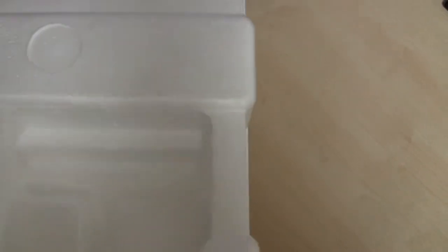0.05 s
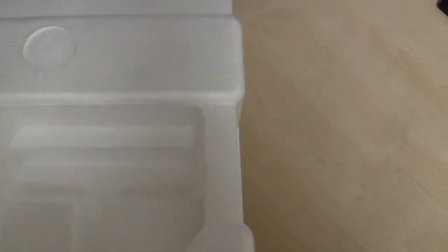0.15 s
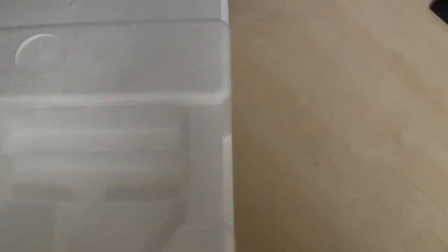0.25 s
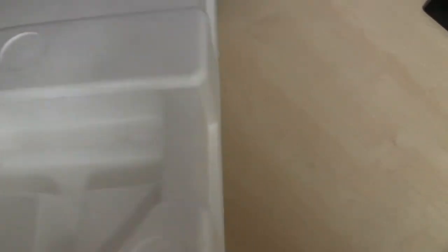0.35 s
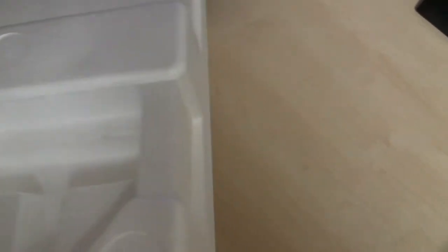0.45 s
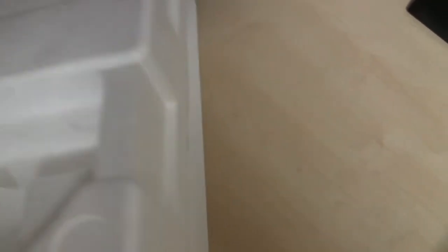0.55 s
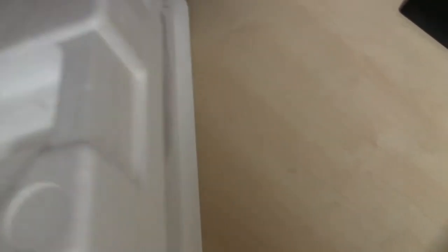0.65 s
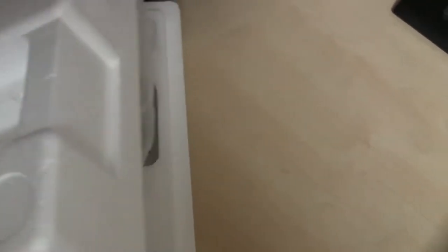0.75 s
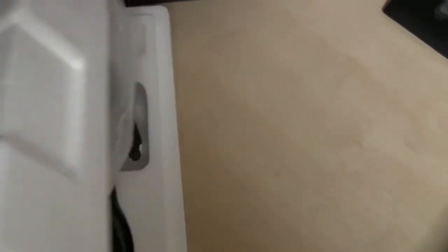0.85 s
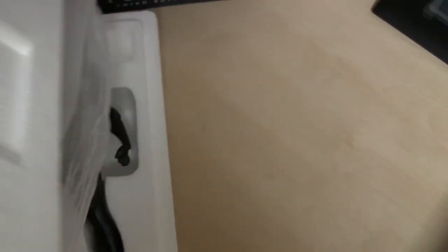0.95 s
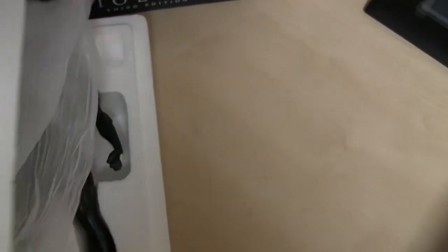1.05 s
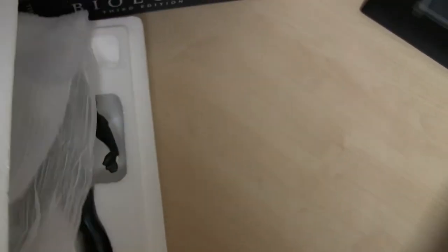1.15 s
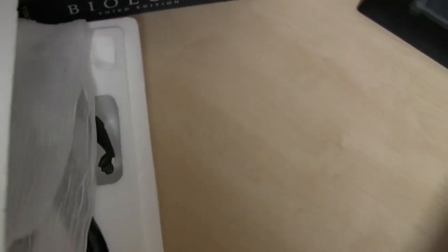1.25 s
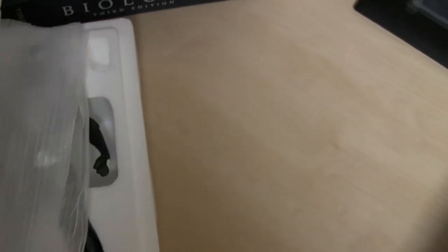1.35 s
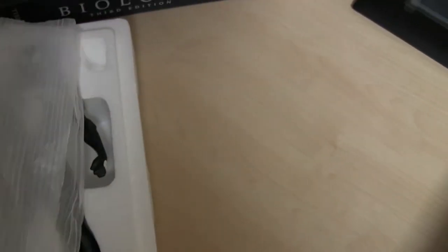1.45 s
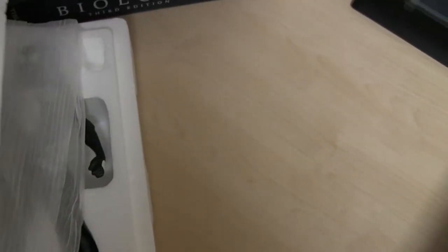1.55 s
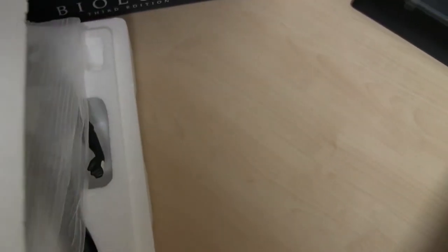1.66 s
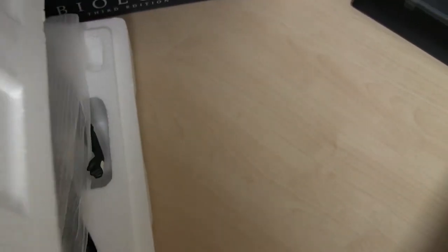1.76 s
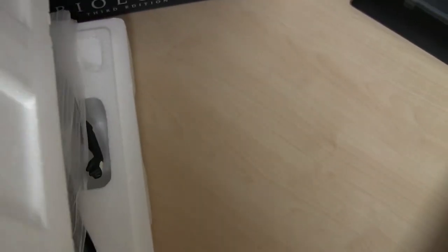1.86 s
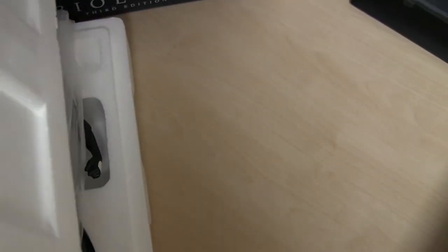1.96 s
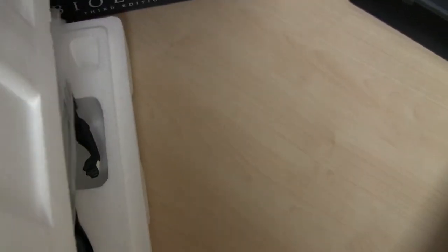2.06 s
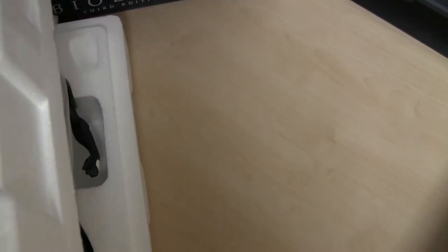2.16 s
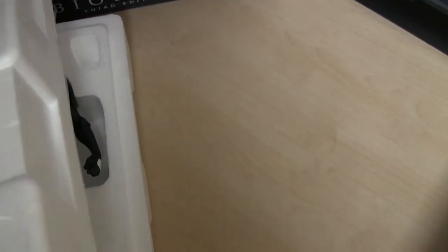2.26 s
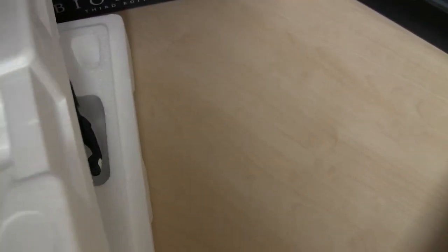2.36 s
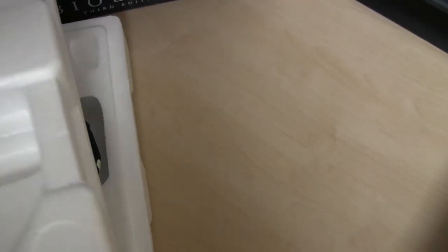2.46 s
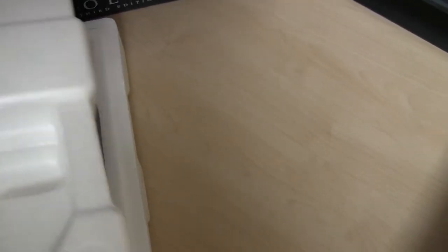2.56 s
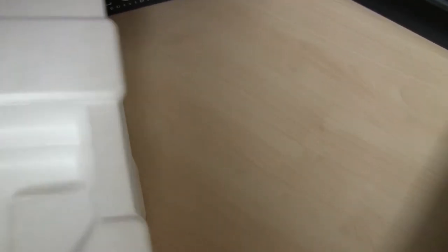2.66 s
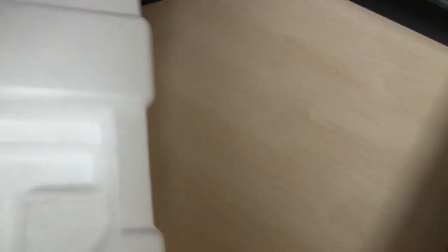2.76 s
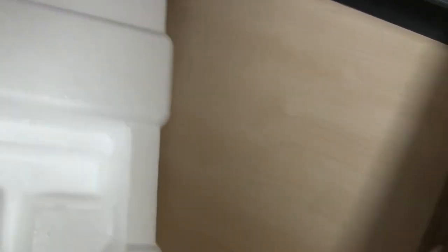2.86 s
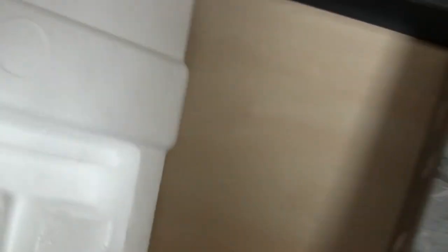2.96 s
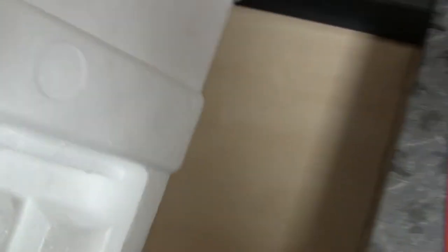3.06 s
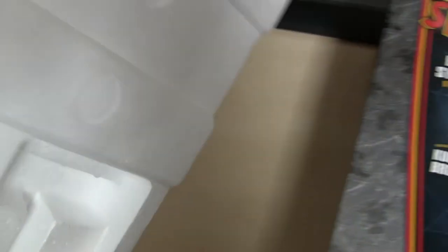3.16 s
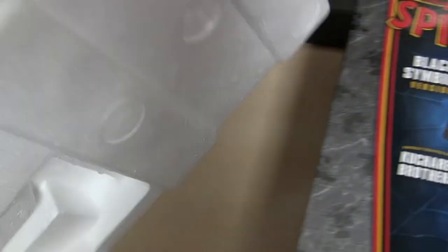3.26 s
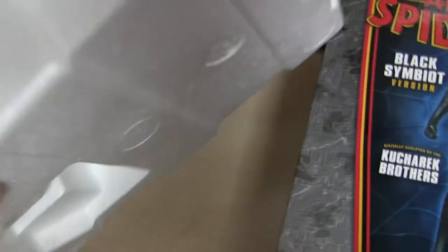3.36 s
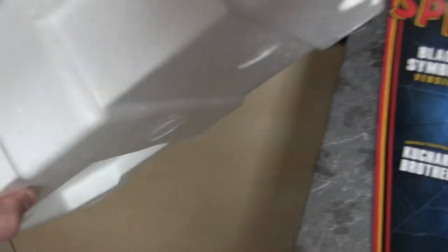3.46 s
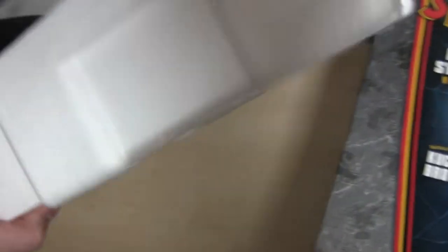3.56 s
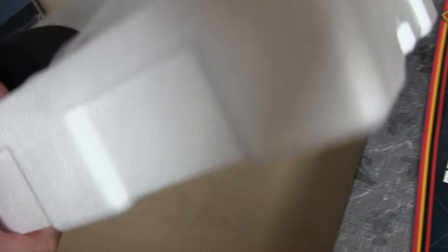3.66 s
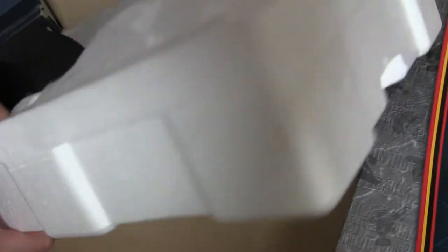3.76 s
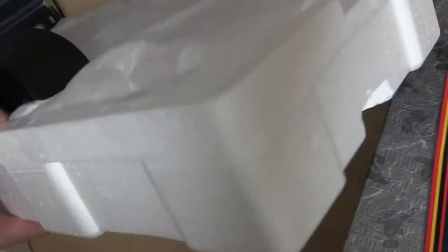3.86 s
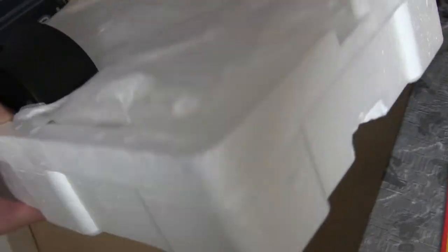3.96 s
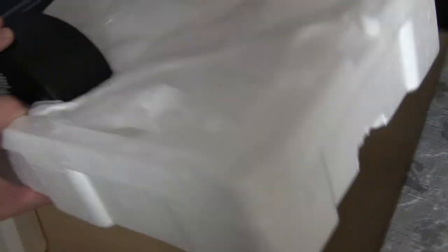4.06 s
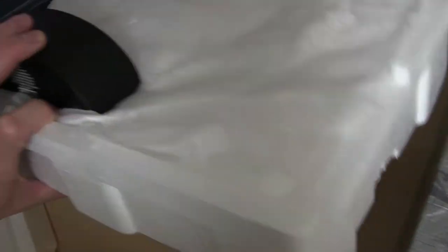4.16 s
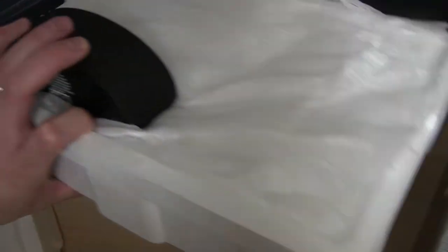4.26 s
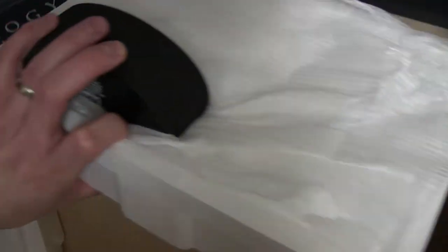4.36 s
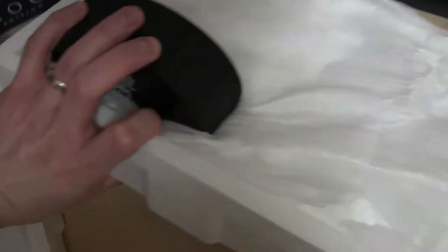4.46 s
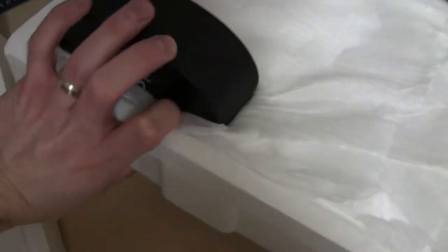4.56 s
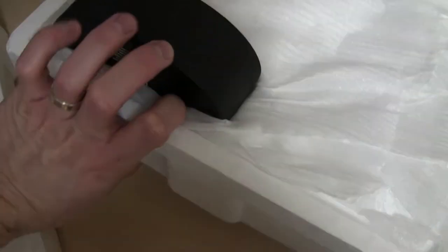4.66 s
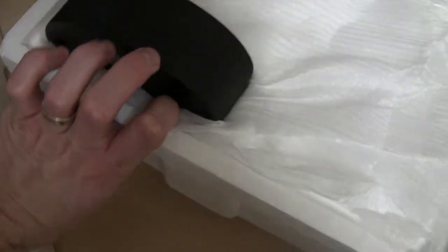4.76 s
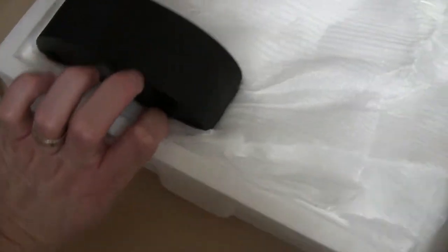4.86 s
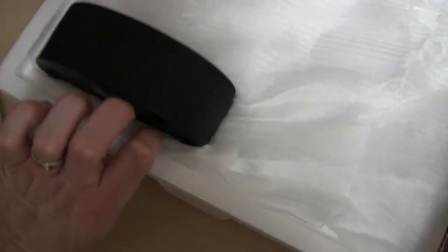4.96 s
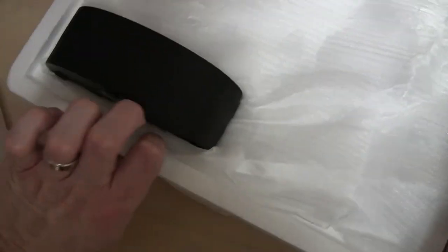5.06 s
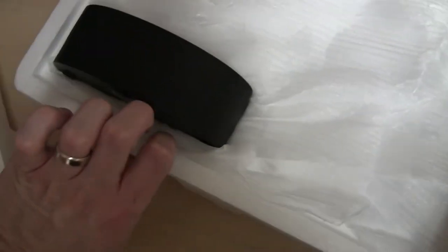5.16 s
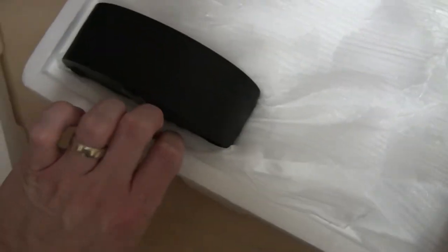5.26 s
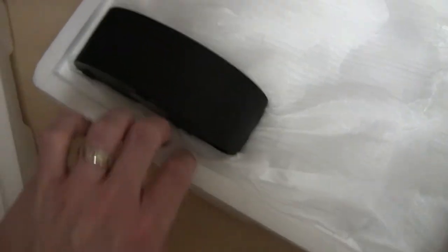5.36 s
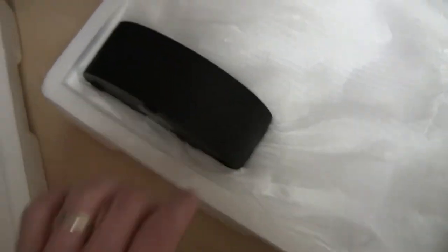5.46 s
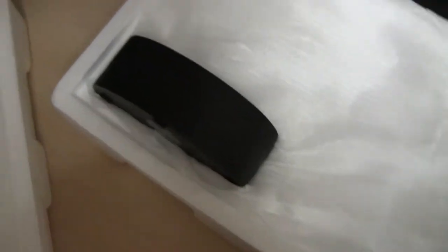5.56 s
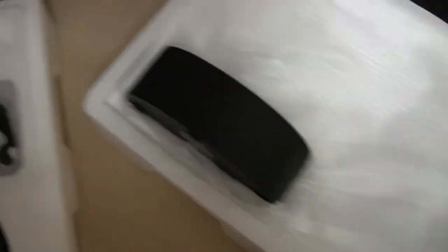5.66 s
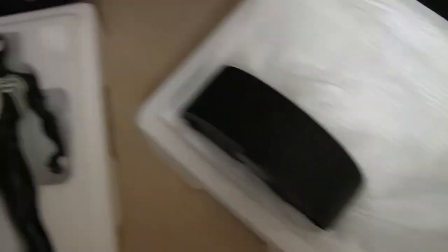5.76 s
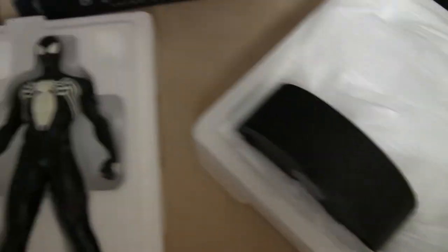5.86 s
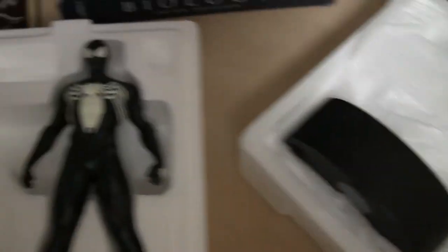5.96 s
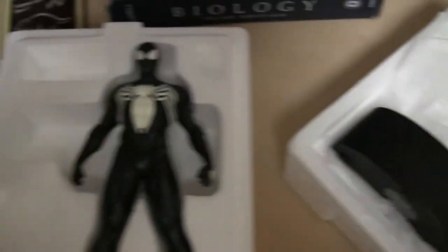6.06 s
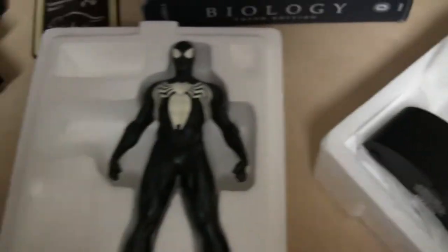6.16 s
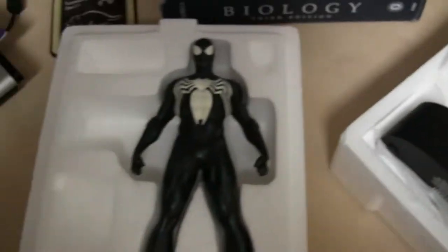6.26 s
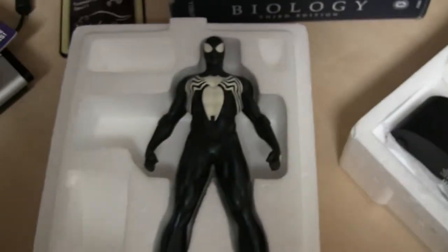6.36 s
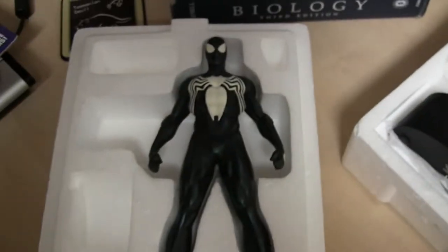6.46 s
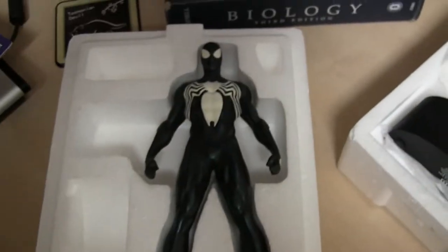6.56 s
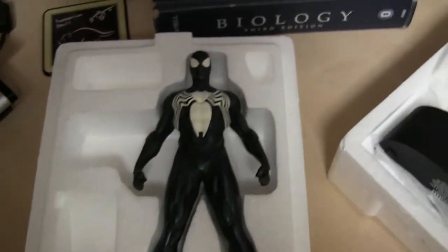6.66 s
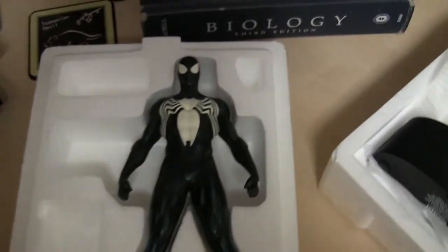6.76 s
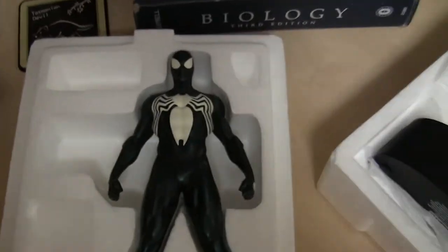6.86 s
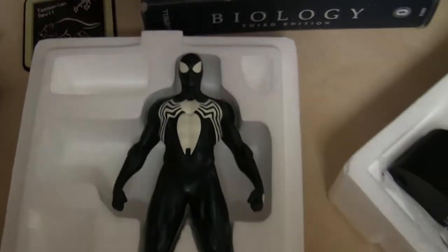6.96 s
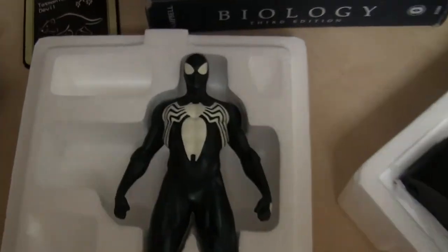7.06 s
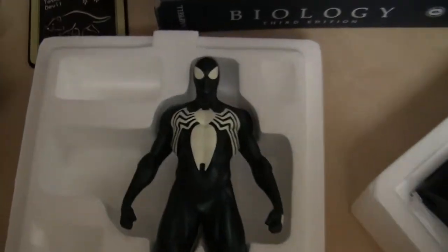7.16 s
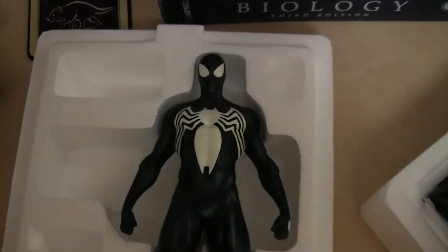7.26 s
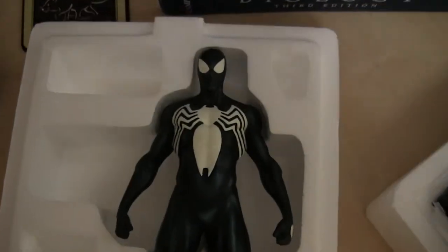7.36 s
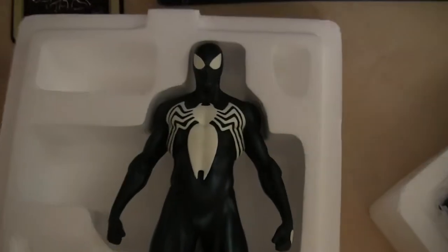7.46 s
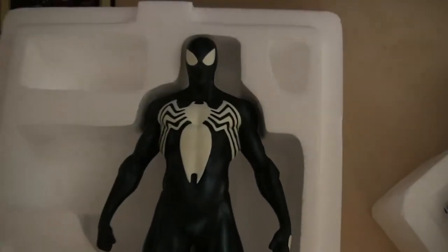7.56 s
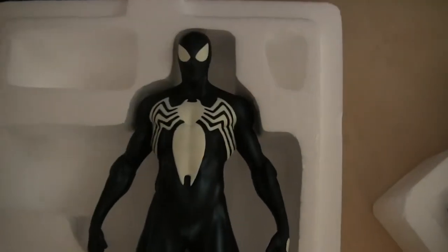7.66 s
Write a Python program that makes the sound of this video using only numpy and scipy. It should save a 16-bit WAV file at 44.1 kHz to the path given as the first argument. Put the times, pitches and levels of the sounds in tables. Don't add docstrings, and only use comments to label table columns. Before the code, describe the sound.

Foam box halves are eased apart near the camera at a desk: hollow bumps, dry squeaks, stick-slip creaks and isolated snaps. Things go nearly silent, then the lower half is knocked and handled, wrapping rustles briefly, and the block is pressed down loudly with bright chattering crackles. A solid set-down and quick rocking follow, then light scuffs, quiet hum and a tiny click.

```python
import sys
import numpy as np
from scipy import signal
from scipy.fft import rfft, irfft, next_fast_len
from scipy.io import wavfile
from scipy.ndimage import uniform_filter1d

SR = 44100
rng = np.random.default_rng(int(sys.argv[2]) if len(sys.argv) > 2 else 0)


def undo_db(level):
    steps = np.asarray(level, float) / 20
    return 10 ** steps


def int16_out(signal):
    q = np.round(np.clip(np.atleast_2d(signal).T, -1, 1) * 32767)
    wavfile.write(sys.argv[1], SR, q.astype(np.int16))


N = 340452
TIME = np.arange(N) / SR


def unit(x):
    return x / np.sqrt(np.mean(x ** 2) + 1e-20)


def along(points, hz):
    f, v = np.transpose(points)
    return np.interp(np.log(hz + 1), np.log(f + 1), v)


def filtered(x, response):
    size = x.shape[-1]
    m = next_fast_len(size + 8192)
    return irfft(rfft(x, m) * response(np.fft.rfftfreq(m, 1 / SR)), m)[..., :size]


def coloured(x, spectrum):
    return unit(filtered(x, lambda hz: undo_db(along(spectrum, hz))))


def resonant(modes):
    def response(f):
        total = 0
        for k, (centre, width, db) in enumerate(modes):
            drag = 1j * f * width
            total = total + (-1) ** k * undo_db(db) * drag / (centre * centre - f * f + drag)
        return total
    return response


def grit(grain_db, streak_db, count=10):
    unevenness = unit(uniform_filter1d(rng.standard_normal(N), size=40))
    beads = rng.standard_normal(N) * undo_db(grain_db * unevenness)
    z = signal.stft(beads, nperseg=512)[2]
    streaks = uniform_filter1d(rng.standard_normal(z.shape), size=3, axis=0)
    streaks = uniform_filter1d(streaks, size=count, axis=1)
    return unit(signal.istft(z * undo_db(streak_db * unit(streaks)), nperseg=512)[1][:N])


def ports(x, spread, bass_hz):
    hz, t, z = signal.stft(x, SR, nperseg=256)
    turn = np.exp(2j * np.pi * rng.random(z.shape))
    scatter = undo_db(along(spread, hz) + 2)[:, None]
    side = signal.istft(z * turn * scatter, SR, nperseg=256)[1][:N]
    side = filtered(side, lambda f: f ** 3 / (f ** 3 + bass_hz ** 3))
    return np.array([x + side, x - side])


def room_hum():
    # [Hz, dB per Hz]
    hum_colour = [(120, -30), (200, -8), (300, -7.5), (500, -12.5), (700, -14), (1040, -10), (1320, -13),
                  (1650, -10), (2050, -11), (2500, -16), (3130, -17), (5500, -22), (16000, -31)]
    # [s, dB]
    hum_level = [(3.3, -57), (5.5, -56)]
    # [Hz, dB]
    diffuse = [(60, -19), (110, -5.5), (200, -1.5), (380, -3.5), (700, -4), (1290, -9), (2380, -6),
               (4400, -8.5), (8120, -8), (15000, -5)]
    hum = undo_db(np.interp(TIME, *np.transpose(hum_level))) * coloured(grit(.6, .8), hum_colour)
    return ports(hum, diffuse, 70) * undo_db([[.55], [-.55]])


def room_echo(foam):
    # [Hz, s]
    decays = [(150, 0.23), (1000, 0.33), (4000, 0.21), (12000, 0.13)]
    hz, t, z = signal.stft(rng.standard_normal((2, SR // 2)), SR, nperseg=256)
    tail = signal.istft(z * undo_db(-60 * t / along(decays, hz)[:, None]), SR, nperseg=256)[1]
    tail = tail / np.linalg.norm(tail[0])
    return signal.fftconvolve(np.pad(foam, (300, 0))[None], tail, axes=1)[:, :N]


def handling():
    # [s, dB, dB]
    jolts = [
        (-.01, -43.5, -76),
        (3.405, -27, -48),
        (4.495, -27.5, -53),
        (5.058, -28, -58),
    ]
    # [s, dB, dB]
    shifts = [(.43, -55.5, -59), (1.07, -56, -83), (1.33, -67, -67), (1.8, -71, -84), (2.9, -55.5, -86),
              (3.65, -54, -71), (4.04, -53.5, -64), (4.74, -40.5, -72.5), (5.2, -49.5, -47),
              (6.0, -64, -61)]
    # [Hz, dB per Hz]
    deep_colour = [(15, -30), (35, -5), (70, 2.5), (110, -6), (300, -70.5)]
    thud_colour = [(50, -41), (100, -9.5), (220, -9.5), (320, -12), (700, -57)]
    held_thud_db, held_deep_db = -67.5, -78
    power = undo_db([[held_thud_db], [held_deep_db]]) ** 2 * np.ones(N)
    for rows, rise, fall in ((jolts, 4000, 220), (shifts, 140, 140)):
        for s, thud_db, deep_db in rows:
            slope = np.where(TIME < s, rise, -fall)
            power += undo_db([[thud_db], [deep_db]]) ** 2 * undo_db(slope * (TIME - s)) ** 2
    thud, deep = np.sqrt(power)
    return deep * coloured(grit(1.5, 0.93), deep_colour) + thud * coloured(grit(5.4, 1.9), thud_colour)


def wrapping():
    # [s, dB]
    slide = [(3.72, -57), (3.77, -56), (3.786, -58.5), (3.958, -46), (4.02, -39), (4.066, -40.5),
             (4.09, -83)]
    # [Hz, dB per Hz]
    sheet = [(2060, -40), (3500, -24), (3920, -10), (5330, -7), (6500, -12), (7270, -5.5), (8000, -11),
             (9440, -0.5), (12000, -10.5), (16000, -24)]
    s, db = np.transpose(slide)
    gain = undo_db(np.interp(TIME, s, db, left=-120, right=-120))
    return gain * coloured(grit(2, 2.4, count=40), sheet)


def knocks():
    # [s, dB, index]
    blows = [(0.083, -6, 0), (0.0889, -5, 0), (0.127, -27.5, 6), (0.163, -17, 6), (3.3968, -11.5, 1),
             (3.4084, -16, 1), (3.4162, -19, 1), (4.4895, 8.5, 2), (5.0522, 4.5, 3), (5.0597, 0, 3),
             (6.627, -29.5, 4), (0.877, -32, 5), (0.903, -34, 5), (0.952, -33, 5), (1.721, -30, 5),
             (1.737, -24, 5), (2.172, -12, 8), (2.352, -26.5, 8), (2.431, -23, 8), (2.445, -25, 8),
             (1.63, -27, 8), (1.2975, -29.5, 8), (3.645, -35, 5), (7.505, -47, 4), (0.098, -29, 0),
             (0.146, -14.5, 7), (0.132, -9, 7), (0.16, -15, 7), (0.175, -21, 7), (0.1859, -15.5, 7),
             (0.993, -33, 5), (1.029, -32, 5), (1.057, -30, 5), (1.312, -29.5, 5), (3.421, -11.5, 1),
             (3.44, -20, 1), (1.493, -37, 5), (1.944, -47, 5)]
    # [s, dB]
    rocks = [(5.072, -30), (5.084, -28), (5.099, -14.5), (5.117, -22), (5.13, -17.5), (5.142, -19.5),
             (5.156, -28), (5.168, -29), (5.185, -27.5), (5.2, -29), (5.222, -34), (5.25, -50)]
    # [Hz, dB, s]
    rings = [
        [(204, -23.5, 0.32), (314, -33, 0.074), (450, -5, 0.019), (666, 3, 0.028), (3000, -4, 0.0094)],
        [(97, -23, 0.093), (130, 9, 0.037), (236, 5, 0.038), (289, -5, 0.09), (440, 6.5, 0.022),
         (845, -21, 0.06)],
        [(293, -8, 0.2), (236, -12, 0.2), (385, -1, 0.018), (750, -11, 0.025), (437, -11.5, 0.15)],
        [(178, -13.5, 0.12), (345, -5.5, 0.087), (765, -2, 0.075), (610, 1.5, 0.057), (1038, 8.5, 0.018),
         (1250, -5.5, 0.028), (1530, -3.5, 0.021)],
        [(1700, 4, 0.0056), (2600, 9, 0.0088), (3300, 4, .004), (4100, 6, 0.004), (5000, 2, 0.009),
         (6400, -11, 0.004)],
        [(299, -4, 0.16), (441, 3.5, 0.1)],
        [(192.5, 5.5, 0.15)],
        [(436, 3.5, 0.054), (778, 1, 0.03), (1650, -11, .03)],
        [(329, -7.5, 0.1), (437, -0.5, 0.041), (590, -13.5, .08), (700, -6.5, 0.062), (1120, -4, 0.055),
         (1540, -5.5, 0.034)],
        [(350, 1, .06), (475, -1, 0.068), (707, 9.5, 0.041), (780, 13, 0.019), (1020, 6, 0.032),
         (1310, 0.5, 0.028), (1580, -3.5, 0.037), (1960, -8.5, 0.031)],
    ]
    still_s, still_t60 = .026, .02
    out, t = np.zeros(N + SR), np.arange(SR // 4) / SR
    rocking = [(s, db, len(rings) - 1) for s, db in rocks]
    for s, db, thing in list(blows) + rocking:
        spot_db = rng.normal(0, 2.5, size=10) * (db < -5)
        grip = 1 + rng.normal(0, .06) * (db < -15)
        swell = .45 if db > -5 else 1.2
        ring = np.zeros(len(t))
        for k, (hz, level, t60) in enumerate(rings[int(thing)]):
            mode = np.sin(2 * np.pi * hz * grip * t) * (1 - np.exp(-t * hz / swell))
            ring += (-1) ** k * undo_db(level + spot_db[k] - 60 * t / t60) * mode
        stilled_db = -60 * np.maximum(t - still_s, 0) / still_t60 * (thing == 2)
        out[round(s * SR):][:len(t)] -= undo_db(db - 12 + stilled_db) * ring
    return out[:N]


def ticks():
    # [s, dB]
    torn = [(4.5327, -27.5), (4.5432, -24), (4.5494, -31), (4.559, -25), (4.569, -17.5), (4.579, -17),
            (4.5864, -29.5), (4.5975, -18.5), (4.608, -30.5), (4.617, -35.5), (4.803, -31), (4.81, -29.5),
            (4.824, -25), (4.8316, -31), (4.837, -30), (4.843, -30.5), (4.8494, -27.5), (4.8635, -27),
            (4.883, -34), (4.8905, -25.5), (4.8966, -26.5), (4.9163, -35), (4.941, -31), (4.951, -28),
            (4.967, -27), (4.976, -32), (4.9836, -22.5), (4.9934, -24), (5.005, -31), (5.018, -27.5),
            (5.023, -24.5), (5.03, -24), (5.0384, -22)]
    push, t = np.zeros(N), np.arange(SR // 200) / SR
    for s, db in torn:
        jab = rng.standard_normal(len(t)) + 1.2 * np.exp(-t / .0001)
        jab = jab * np.exp(-t / 0.0013)
        push[round(s * SR):][:len(t)] += undo_db(db + 14.5) * jab / np.linalg.norm(jab)
    return .04 * push, push


def squeaks():
    # [s, s, dB, Hz]
    songs = [(2.25, 0.03, -48, 1520), (2.245, 0.025, -50, 2010), (2.29, .015, -51.5, 1600),
             (1.89, .04, -43, 1300), (3.5, 0.021, -41, 800), (3.495, 0.024, -41, 1230),
             (3.5, 0.022, -49, 1960), (.14, 0.027, -34.5, 780), (.13, .025, -39, 1500),
             (.17, .03, -36, 436), (4.83, 0.018, -37, 1000), (4.885, .02, -37.5, 1470),
             (4.66, 0.019, -34, 600), (4.79, 0.029, -34, 590), (.15, 0.057, -41.5, 310),
             (.15, .04, -40, 1000), (2.15, .08, -53, 302), (5.19, 0.047, -44.5, 1950),
             (5.25, 0.024, -45.5, 764), (.66, 0.023, -51, 1200), (.54, .03, -54, 2050),
             (.34, 0.064, -55, 656)]
    lead_s, width_hz = .1, 60
    out, t = np.zeros(N + SR), np.arange(SR // 4) / SR - lead_s
    for s, half, db, hz in songs:
        band = resonant([(hz, width_hz, 0)])
        tone = unit(filtered(rng.standard_normal(len(t)), lambda f: band(f) ** 2))
        out[round((s - lead_s) * SR):][:len(t)] += undo_db(db) * np.exp(-(t / half) ** 4) * tone
    return out[:N]


def creaks():
    # columns start_s, end_s, slips_per_s, first_db, last_db, dullness_hz, direction (1 or -1)
    runs = [
        (0.1282, 0.198, 135, -17, -23, 1300, -1),
        (.143, .152, 133, -13, -13, 1800, -1),
        (1.7199, 1.74, 58.5, -24, -23, 2600, 1),
        (1.7506, 1.83, 118.3, -19, -15, 3000, 1),
    ]
    blunt = np.zeros(N)
    for start, end, rate, first_db, last_db, dull_hz, way in runs:
        chance = rng.standard_normal((40, 2))
        s = (np.arange(len(chance)) + 0.03 * chance[:, 0]) / rate
        db = np.interp(s + start, [start, end], [first_db, last_db]) + 1.5 * chance[:, 1]
        train = np.zeros(SR)
        train[np.round(np.abs(s) * SR).astype(int)] = (s < end - start) * undo_db(db)

        def soften(f):
            return SR / dull_hz / 4 * (1j * f / (300 + 1j * f)) / (1 + 1j * f / dull_hz) ** 2
        blunt[round(start * SR):][:SR // 4] += filtered(np.sign(way) * train[:SR // 4], soften)
    edge = filtered(blunt, resonant([(2900, 500, 6)]))
    return 1.1 * blunt + edge, 0.4 * blunt


def slips():
    # [s, dB, dB, Hz]
    lid_slips = [(0.0836, -14.5, 0, 3000), (0.088, -10, -11.5, 3900), (1.0272, -23.5, -2, 2780),
                 (1.055, -29, -0.5, 2580), (1.073, -17.5, -8, 3000), (1.2972, -22, -10, 2720),
                 (1.488, -35, 4, 3520), (1.6292, -23.5, -3.5, 5640), (1.6881, -21, -10, 5570),
                 (1.8352, -8.5, -15.5, 2000), (1.8462, -18, -19, 2200), (1.9435, -14.5, -13.5, 2900),
                 (2.1733, -15.5, -27, 2970), (2.3514, -22, -13.5, 5000), (2.4329, -17.5, -22, 2970)]
    tray_slips = [(3.3485, -43, 7, 3830), (3.3976, -23, -14, 3270), (3.4037, -23, 2, 3320),
                  (3.4775, -15.5, -11.5, 3060), (3.4871, -16, -6, 3100), (3.4958, -19.5, 0, 3120),
                  (3.5102, -20.5, -0.5, 3030), (3.7623, -30.5, 3, 4790), (4.1844, -47, -4, 7700),
                  (4.1954, -52.5, 13.5, 2970), (4.2812, -18.5, -2, 4840), (4.5585, -21.5, 4.5, 3690),
                  (4.5684, -26.5, 11, 3660), (4.5778, -23.5, 1.5, 2660), (4.592, -14.5, 2, 4600),
                  (4.5415, -32, 8, 2100), (4.5313, -22.5, 3, 2080), (4.93, -20, 0, 3230),
                  (4.422, -36.5, 4.5, 1990), (3.4075, -22.5, -5, 3150), (5.7584, -42.5, 7, 3800)]
    chatter = [(4.701, -9.5, -1.5, 6700), (4.7128, -10.5, -7, 6760), (4.7254, -9.5, -4, 6700),
               (4.7514, -10.5, -6, 6800)]
    crinkles = [(0.1171, -16, 1, 2950), (0.9677, -40.5, -5, 9000), (1.1657, -39.5, -12, 4400),
                (1.1887, -32, -24, 4540), (4.1315, -43.5, -20, 5650), (4.7424, -10, 0.5, 4800),
                (4.7824, -19, 8, 3270), (4.6445, -15.5, 3.5, 3480)]
    # rows, fizz dB above the ring, t60 s, ring sharpness dB, crack over spray
    kinds = [(lid_slips, -20, .036, 5, 9), (tray_slips, -11, .042, 11, 2.5),
             (chatter, -14, .028, 12, 2.5), (crinkles, -3, .042, 7, 3)]
    snap, push, t = np.zeros(N + SR), np.zeros(N + SR), np.arange(SR // 12) / SR
    crack = t / .00006 * np.exp(1 - t / .00006)

    def dull(f):
        return 1 / (1 + 1j * f / 7500) ** 2

    def fizz_tone(f):
        return ((1j * f / 7500) ** 2 * dull(f)) ** 2 / (1 + 1j * f / 11000) ** 2

    for rows, fizz_db, t60, sharp_db, sudden in kinds:
        for s, db, block_db, ring_hz in rows:
            fade = undo_db(-60 * (t / (0.49 * t60)) ** 2.9 - 25 * t / t60)
            spray = rng.standard_normal((3, len(t))) * fade
            body = resonant([(ring_hz, 330, sharp_db)])

            def ring_tone(f):
                treble = (1j * f / (2200 + 1j * f)) ** 2
                return treble * (1.5 + body(f)) * dull(f) / (1 + 1j * f / 9500)
            ring = filtered(spray[0] + sudden * crack, ring_tone)
            fizz = filtered((spray[2] + 1.8 * crack) * undo_db(-60 * t / t60), fizz_tone)
            kick = spray[1] + sudden ** 2 / 4 * t / 0.0005 * np.exp(-t / 0.0003)
            at = round((s + .0007) * SR)
            snap[at:][:len(t)] += undo_db(db - 3.5) * ring / np.abs(ring).max()
            snap[at:][:len(t)] += undo_db(db + fizz_db + 5.0) * fizz / np.abs(fizz).max()
            push[at:][:len(t)] += undo_db(db + block_db + 13.0) * kick / np.linalg.norm(kick)
    return snap[:N], push[:N]


def strokes():
    # [s, s, dB, dB, dB]
    slow_rubs = [(-.02, 0.227, -53, -40.5, -4), (0.265, 0.446, -59, -68, 5),
                 (.45, 0.657, -61.5, -46.5, -1.5), (.65, 0.813, -52, -53, -7),
                 (0.832, 1.094, -66.5, -59.5, 7.5), (1.11, 1.222, -57, -60, 3), (1.338, 1.48, -54, -71, -4),
                 (1.503, 1.704, -63.5, -43, 4), (1.724, 1.822, -47, -38.5, 1),
                 (1.816, 1.934, -36, -49.5, -3), (1.92, 2.127, -55, -67, 8.5),
                 (2.14, 2.504, -46.5, -62.5, -3.5), (2.44, 2.74, -53.5, -62.5, -3),
                 (2.762, 3.39, -65.5, -84.5, 8), (3.414, 3.73, -43, -59, -3),
                 (3.741, 4.074, -52.5, -55, -4.5), (4.1, 4.26, -84, -81, -5.5),
                 (4.305, 4.393, -40.5, -50.5, -4.5), (4.396, 4.494, -44, -46, -5.5),
                 (4.49, 4.528, -34.5, -38, -1.5), (4.529, 4.6, -35.5, -31.5, -6),
                 (4.598, 4.7, -33, -37.5, -4), (4.686, 4.796, -48, -39.5, 5.5),
                 (4.803, 4.867, -37.5, -38, 1.5), (4.874, 4.953, -35.5, -38.5, -7),
                 (4.939, 5.052, -39, -28, -8.5), (5.068, 5.19, -57, -46.5, 5.5),
                 (5.183, 5.306, -40, -49, -14)]
    edge_s, fizz_db = 0.0084, -3
    power = np.zeros((3, N))
    for start, end, first_db, last_db, block_db in slow_rubs:
        near = slice(max(round((start - .1) * SR), 0), round((end + .1) * SR))
        t = TIME[near]
        contact = (np.tanh((t - start) / edge_s) - np.tanh((t - end) / edge_s)) / 2
        db = np.interp(t, [start, end], [first_db, last_db]) + [[0], [fizz_db], [block_db]]
        power[:, near] += contact * undo_db(db) ** 2
    return power


def rubbing():
    # [s, dB, dB, dB, s]
    short_rubs = [(0.004, -39.5, -2, -2.5, 0.01), (0.106, -31, -10, 0, 0.029), (0.31, -43, -14, 1.5, 0.037),
                  (.345, -49, -9, -4, 0.013), (0.4, -39.5, -13, 5, 0.0081), (0.439, -45, 0, 2, 0.01),
                  (0.5, -39.5, -6, 2, 0.014), (.55, -47.5, -5, -1.5, 0.018), (0.654, -46.5, -21, 4, 0.029),
                  (0.787, -44.5, -10.5, -4, 0.014), (1.303, -42.5, -1, -7, 0.016),
                  (2.01, -45.5, -19, -21, 0.02), (2.059, -42.5, -11, -4, 0.012),
                  (2.119, -40.5, -6, 2, 0.01), (2.252, -39.5, -8.5, -2, 0.025),
                  (2.392, -55, -17.5, 11, 0.0079), (2.715, -55, -0.5, -4, 0.032),
                  (3.031, -53.5, -3.5, -5, 0.022), (3.622, -46, -8, -23, 0.036),
                  (4.285, -34.5, -15, 0, 0.0093), (5.023, -33, -14, 10, 0.016),
                  (5.371, -37.5, -6, -7.5, 0.013), (5.403, -36, -9.5, -5, 0.014),
                  (5.781, -55, -2, -8, 0.0093)]
    # [Hz, dB per Hz]
    scuff_colour = [(1400, -17.5), (2300, -5), (3200, -3.5), (5400, -5), (7500, -18), (10000, -16.5),
                    (16500, -56)]
    fizz_colour = [(4000, -24), (6500, 1.5), (9000, -1), (12000, -3), (14500, -8), (16500, -16.5)]
    power = strokes()
    for top, db, block_db, fizz_db, fall in short_rubs:
        near = slice(max(round(top * SR) - SR // 8, 0), round(top * SR) + SR // 8)
        late = TIME[near] - top
        pace = np.where(late < 0, 0.62 * fall, fall)
        level = undo_db([[db], [db + fizz_db], [db + block_db]])
        power[:, near] += level ** 2 * np.exp(-(late / pace) ** 2)
    scuff, fizz, block = np.sqrt(np.abs(power))
    surface = scuff * coloured(grit(0.88, 3.13, count=14), scuff_colour)
    surface += fizz * coloured(grit(2.77, 2.0, count=12), fizz_colour)
    light = coloured(grit(3.2, 1.7), [(200, -6.0), (600, 5.0), (1500, 2.0), (20000, -4.5)])
    return surface, block * light


def blocks(push):
    # columns pitch_hz, width_hz, level_db
    lid = [(192, 7.4, -7.5), (309.7, 17.4, 2.5), (440, 26.6, 9), (619, 83, 4.5), (810, 210, 2.5),
           (1060, 265, 3), (1232, 48, 8.5), (1517, 214, 7.5), (2002, 180, 7.5), (2210, 300, 3.5)]
    tray = [(330, 75, -10.5), (431, 12, -3), (616, 230, -7), (804, 81, -3), (970, 220, -7.5),
            (1228, 44, 0.5), (1445, 180, -4.5), (1995, 110, -4.5), (2250, 120, -10)]
    pressed_tray = [(310.7, 16, -8), (591, 62, -1.5), (733, 90, -7.5), (982, 93, -2), (1184, 37, -2),
                    (1467, 88, 2), (1820, 81, -4), (2030, 109, -2.5), (2720, 44, -14.5), (3176, 38, -5.5)]
    swap_s, press_s, land_s = 3.3, 4.48, 5.05
    grid = np.linspace(0, SR / 2, num=4000)
    pressed = (TIME >= press_s) & (TIME < land_s)
    out = np.zeros(N)
    for modes, held in ((lid, TIME < swap_s), (tray, (TIME >= swap_s) & ~pressed), (pressed_tray, pressed)):
        response = resonant(modes)
        out += filtered(push * held, response) / np.sqrt(np.mean(np.abs(response(grid)) ** 2))
    return out


def scene():
    # [s, dB]
    pan = [(0.0, 1), (1.06, 1.2), (2.74, 2), (2.92, 0), (4.9, 0.29), (5.04, -0.72), (5.35, -1), (5.6, 0)]
    # [Hz, dB]
    spread = [(60, -20), (500, -16), (1000, -20), (2000, -19), (4000, -13), (8000, -11), (15000, -11)]
    surface, push = np.sum([rubbing(), slips(), creaks(), ticks()], axis=0)
    foam = surface + blocks(push) + wrapping() + knocks() + squeaks()
    echo = room_echo(foam)
    pan_db = np.interp(TIME, *np.transpose(pan)) / 2
    near = ports(foam + undo_db(-13.0) * echo[0] + handling(), spread, 130)
    near = near * undo_db([pan_db, -pan_db]) + undo_db(-49.0) * echo
    return near + room_hum()


def low_pass(x):
    return signal.sosfilt(signal.butter(12, 15840, fs=SR, output="sos"), x)


def record(dry):
    bass_hz, top_hz = 45, 15900
    heard = filtered(dry, lambda f: (1j * f / (bass_hz + 1j * f)) / np.sqrt(1 + (f / top_hz) ** 60))
    heard = heard / (1 + np.abs(heard / .98) ** 6) ** (1 / 6)
    return low_pass(heard)


dry = scene()
out = record(dry)
int16_out(out)
```